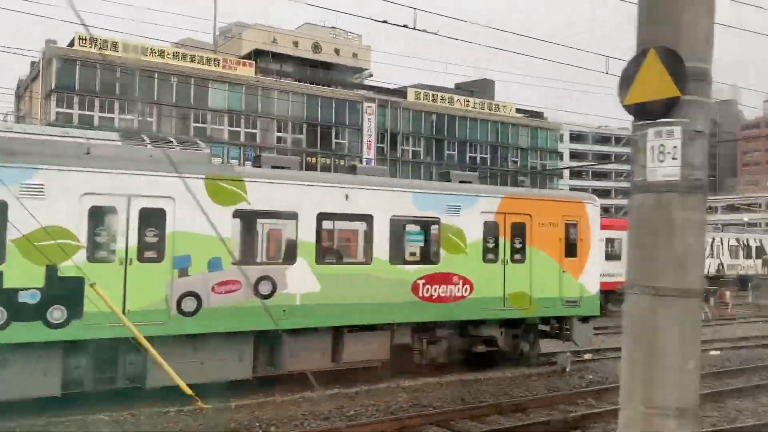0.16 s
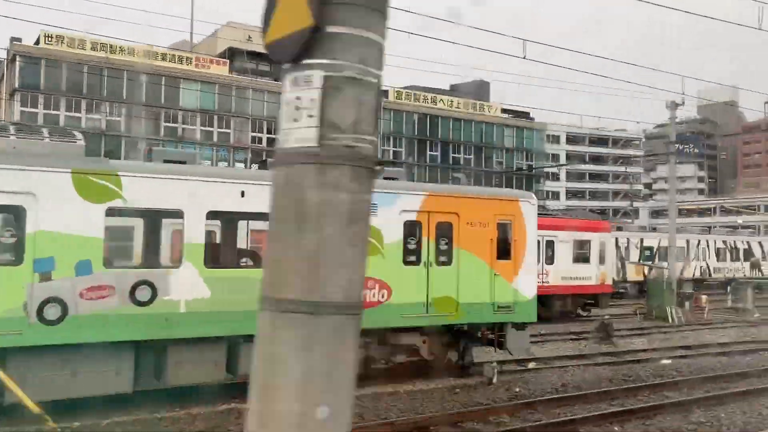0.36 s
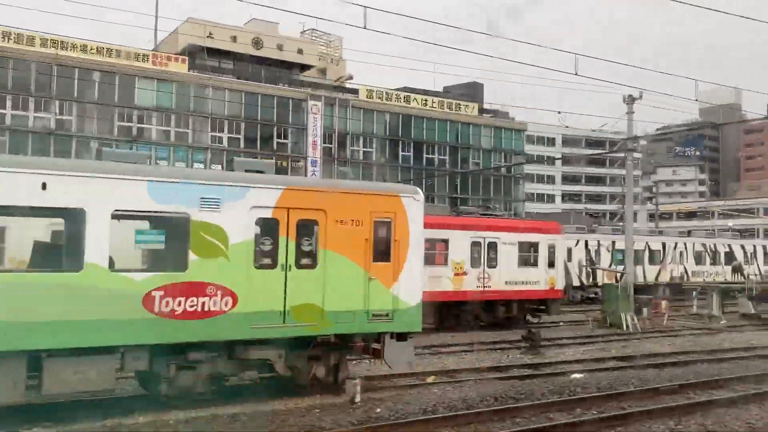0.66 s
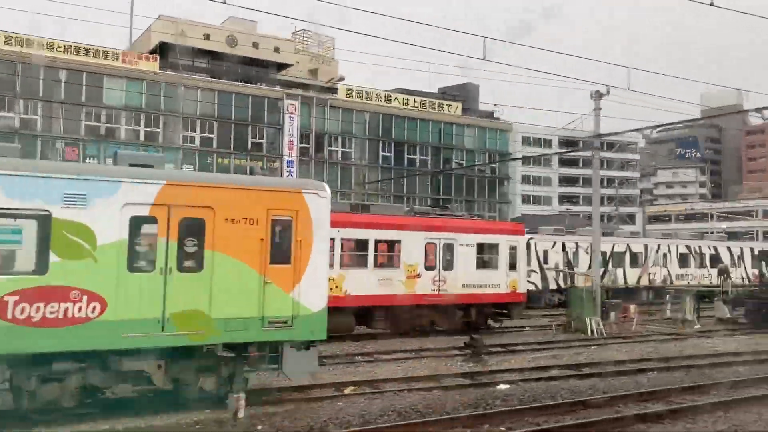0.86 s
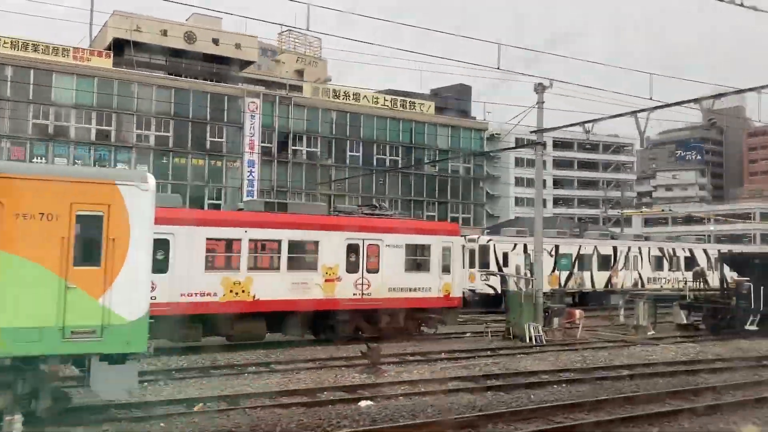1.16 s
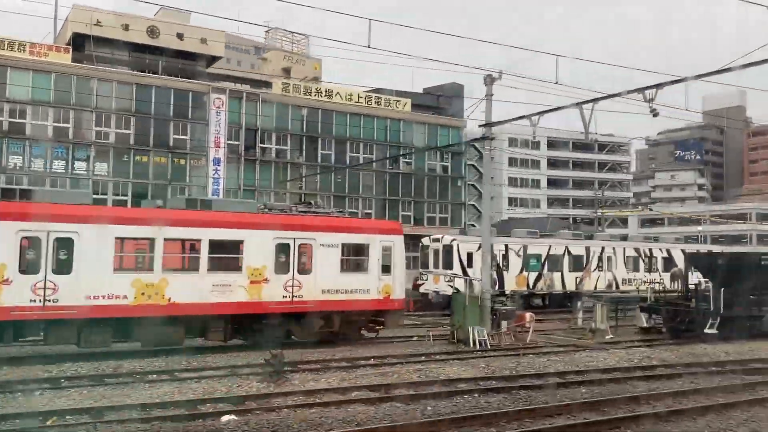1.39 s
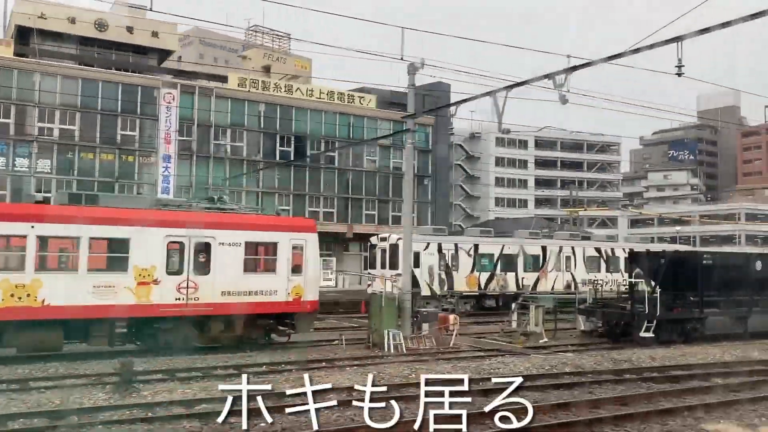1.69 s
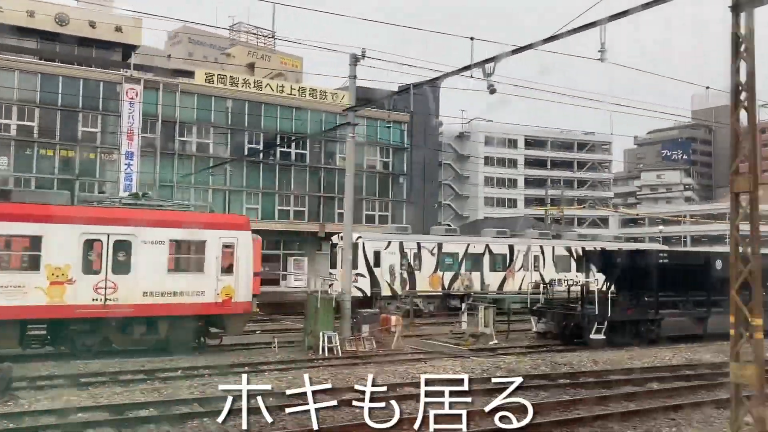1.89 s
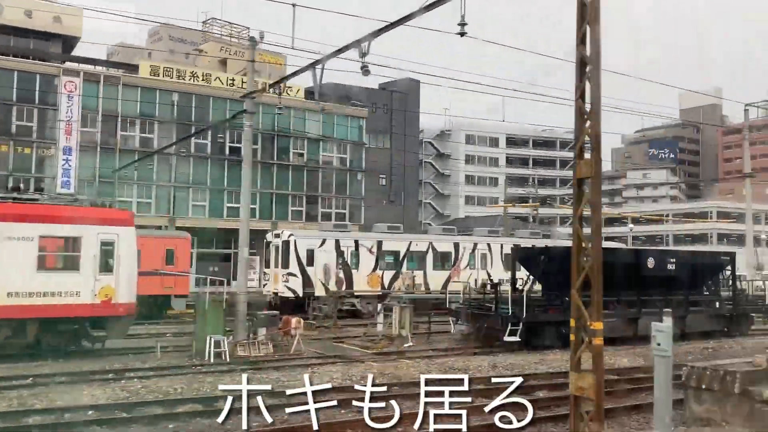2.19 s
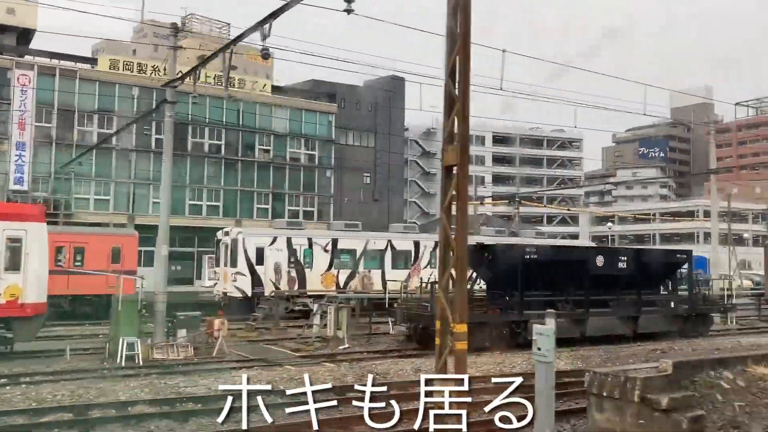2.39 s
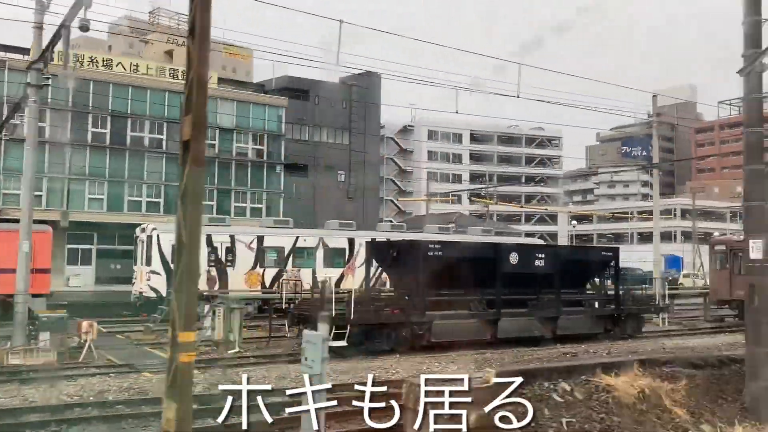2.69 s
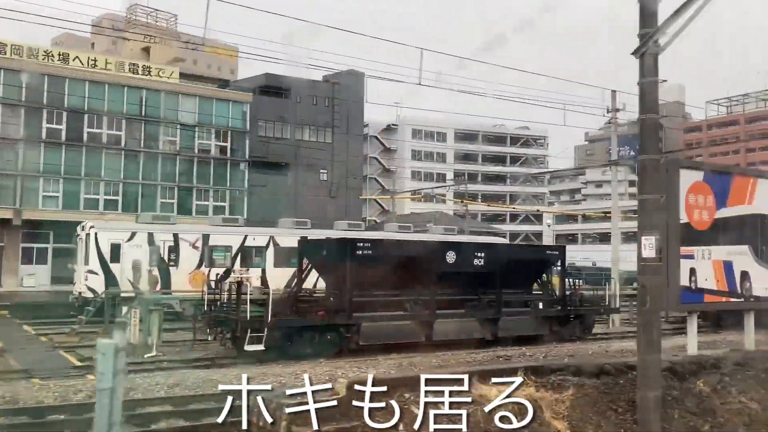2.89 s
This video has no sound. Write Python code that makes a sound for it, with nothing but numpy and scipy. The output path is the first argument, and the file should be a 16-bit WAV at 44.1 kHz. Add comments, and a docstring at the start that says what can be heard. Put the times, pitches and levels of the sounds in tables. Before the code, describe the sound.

Train wheels thud and clack irregularly over joints and points, heard inside the cabin in stereo; low rumble and electric hum continue beneath, with small rattles, air spits and a metallic clink late on.

```python
"""Electric train in a yard

The car rumbles and hums: filtered noise and wavering sines. Wheels thud over rail joints and points:
falling sines, panel modes, steel noise and a long modal ring. Fittings tick, rattle and jingle as
short resonant noise; what is probably compressed air spits, puffs and hisses as coloured noise.
Stereo sound in the small cabin: the likeness of the two sides depends on frequency."""
import sys
import numpy as np
from scipy import signal
from scipy.fft import rfft, irfft, next_fast_len
from scipy.io import wavfile
from scipy.ndimage import map_coordinates

SR = 44100
rng = np.random.default_rng(int(sys.argv[2]) if len(sys.argv) > 2 else 0)


def digitize_waveform(pressure):
    """Quantize a signal to 16-bit integers and store it at the path in sys.argv[1].

    Rows of a 2-D input are taken as channels; values are limited to [-1, 1].
    """
    field = np.atleast_2d(pressure).T
    bounded = np.clip(field, -1, 1)
    quanta = np.round(bounded * 32767).astype(np.int16)
    wavfile.write(sys.argv[1], SR, quanta)


N = 134505
T = np.arange(N) / SR  # time in seconds
M = next_fast_len(N + 8192)  # padded transform length
HZ = np.fft.rfftfreq(M, 1 / SR)

# Likeness of the two sides in the cabin. Each row: frequency in Hz, left-right correlation.
CABIN_ALIKE = [(60, 0.98), (150, 0.93), (260, 0.85), (500, 0.57), (1000, 0), (2000, 0), (5000, 0.056)]
# Singing of wheels on rails, which the jingle follows. Each row: time in seconds, relative level in dB.
SINGING_LEVEL = [(0, -58), (.45, -53), (.7, -51), (.88, -54), (1.4, -59), (2.0, -57), (2.5, -55),
                 (2.8, -50.5), (3.05, -52.5)]

METAL_ATTACK_S = 0.0019  # rise of a knock or clink
CHATTER_DB, CHATTER_RATE = 2.2, 140  # roughness of metal contact: depth in dB, knots per second


def amp(db):
    """Level law: decibels to amplitude ratio."""
    return 10 ** (np.asarray(db) / 20)


def unit(x):
    """Normalisation to unit mean power (rms 1)."""
    return x / np.sqrt(np.mean(x ** 2) + 1e-20)


def along(points):
    """Interpolation of (Hz, value) points on a logarithmic frequency axis."""
    hz, value = np.transpose(points)
    return np.interp(np.log(HZ + 1), np.log(hz + 1), value)


def curve(rows):
    """Linear interpolation of (seconds, value) points in time."""
    return np.interp(T, *np.transpose(rows))


def wobble(rate):
    """Slow random modulation: a smooth curve through normal random knots, rate per second."""
    knots = rng.standard_normal(int(N * rate / SR) + 4)
    return map_coordinates(knots, [T * rate])


def noise(spectrum_db, alike, phase=0):
    """Partially coherent coloured stereo noise of rms 1; phase is the lead of the left side in radians."""
    a, b = rfft(rng.standard_normal((2, M))) * amp(spectrum_db)
    # The cosine of twice this mixing angle is the correlation of the sides.
    angle = np.arccos(np.clip(along(alike), -1, 1)) / 2
    mid = a * np.cos(angle)
    side = b * np.sin(angle)
    left = (mid + side) * np.exp(1j * phase)
    right = mid - side
    return unit(irfft(np.array([left, right]), M)[:, :N])


def envelope(start, attack, hold, t60):
    """Transient law: linear rise, then exponential decay from hold seconds after the start."""
    t = T - start
    rise = np.clip(t / attack, 0, 1)
    return rise * amp(-60 * np.clip((t - hold) / t60, 0, 2))


def tone(hz):
    """Frequency and amplitude modulation of a sine of about rms 1."""
    drift_hz, swing_db = 2.033, 1
    level = np.sqrt(2) * amp(swing_db * wobble(6.73))
    cycles = np.cumsum(hz + drift_hz * wobble(14)) / SR
    return level * np.sin(2 * np.pi * cycles)


def ringing(modes, drift_hz, spread):
    """Modal sum of (Hz, dB) sines wavering in pitch; spread scatters the sides' phase, in radians."""
    out = np.zeros((2, N))
    for hz, db in modes:
        cycles = np.cumsum(hz + drift_hz * wobble(40)) / SR + rng.random()
        side_phase = np.outer([.5, -.5], spread * wobble(12))
        out += np.sqrt(2) * amp(db) * np.sin(2 * np.pi * cycles + side_phase)
    return out


def chatter():
    """Random amplitude modulation of rms 1, the roughness of metal contact."""
    return unit(amp(CHATTER_DB * wobble(CHATTER_RATE)))


def rolling():
    """Broadband rolling excitation: wheels roar and sing on the rails and the car body booms."""
    # Spectra of roar, singing and boom. Each row: frequency in Hz, relative density in dB per Hz.
    roar_spectrum = [(50, -32.5), (85, -14.5), (125, -5), (175, -1.5), (230, -9.5), (330, -10), (410, -11),
                     (490, -14), (590, -17.5), (680, -28.5), (800, -31.5), (1070, -31.5), (1300, -40),
                     (1950, -40.5), (2300, -41.5), (2900, -43), (3800, -49.5), (5500, -55), (9000, -77),
                     (15000, -100)]
    singing_spectrum = [(450, -23), (650, 9), (760, 6), (900, -1.5), (1080, 4.5), (1300, -7.5),
                        (1900, -12.5), (3000, -49.5)]
    boom_spectrum = [(15, -19), (30, -3), (42, 12), (60, 15.5), (78, 9), (105, 10), (150, -9), (300, -70)]
    # Courses of roar and boom. Each row: time in seconds, relative level in dB.
    roar_level = [(0.0, -33), (0.36, -37), (0.64, -32.5), (0.8, -35), (1.0, -31), (1.1, -33), (1.78, -34),
                  (1.84, -32), (2.21, -35.5), (2.54, -37), (2.7, -34.5), (3.05, -35)]
    boom_level = [(0, -47), (.13, -32), (.42, -38), (.53, -28), (.59, -28), (.65, -32.5), (.8, -30),
                  (.9, -29), (.98, -33), (1.45, -28.5), (1.55, -31), (1.68, -25.5), (1.76, -37),
                  (1.85, -23), (1.95, -32.5), (2.53, -37), (2.63, -27), (2.78, -36.5), (2.88, -29.5),
                  (3.05, -37.5)]
    gain_db, swing_db = 1.5, 1.2  # gain of roar and boom, random swing of roar and singing

    roar_gain = amp(curve(roar_level) + gain_db + swing_db * wobble(20))
    roar = noise(along(roar_spectrum), CABIN_ALIKE) * roar_gain
    singing_gain = amp(curve(SINGING_LEVEL) + swing_db * wobble(25.14))
    singing = noise(along(singing_spectrum), CABIN_ALIKE) * singing_gain
    boom = noise(along(boom_spectrum), CABIN_ALIKE) * amp(curve(boom_level) + gain_db)
    return roar + singing + boom


def hum():
    """Narrowband sources: steady tones of the electric gear and brief thin whines of the wheels."""
    # Electric gear. Each row: frequency in Hz, level in dB.
    gear_tones = [(60.5, -45), (145.2, -37), (289.5, -45.5), (435, -47), (555, -54.5), (2013, -79.5)]
    # Wheel whines. Each row: start in seconds, time to release in seconds, frequency in Hz, level in dB.
    whines = [(2.29, .33, 1067, -56.5), (2.29, .36, 1421, -67.5), (1.445, .04, 10300, -68)]
    whine_attack_s, whine_t60_s = 0.014, .3

    out = np.zeros(N)
    for hz, db in gear_tones:
        out += amp(db) * tone(hz)
    for start, hold, hz, db in whines:
        out += amp(db) * tone(hz) * envelope(start, whine_attack_s, hold, whine_t60_s)
    return out


def jingle():
    """Shot noise of small random steel contacts in the running gear, stronger when the rails sing."""
    # Spectrum of the contacts. Each row: frequency in Hz, relative density in dB per Hz.
    jingle_spectrum = [(500, -9), (850, 11), (1300, 3), (1600, -7), (1920, 3), (2250, -11.5), (2800, -0.5),
                       (3300, -4), (4000, -18.5), (8000, -40)]
    contacts_per_s, scatter_db, t60_s = 55, 7, .05
    level_db = -3.5  # relative to the singing

    hits = (rng.random(N) < contacts_per_s / SR) * amp(scatter_db * rng.uniform(-1.5, 1, N))
    power_decay = amp(-60 * T / t60_s) ** 2
    power = np.abs(signal.fftconvolve(hits ** 2, power_decay)[:N])
    strength = unit(np.sqrt(power)) * amp(curve(SINGING_LEVEL) + level_db)
    return strength * noise(along(jingle_spectrum), CABIN_ALIKE)


def air():
    """Turbulent jet noise: leak, puffs and spits add in power, and more flow is brighter."""
    # Steady leak. Each row: time in seconds, relative level in dB.
    leak = [(0, -66.5), (.2, -65), (.27, -56), (.48, -63.5), (1.02, -65.5), (1.43, -64), (1.6, -64),
            (1.9, -62.5), (2.0, -66), (2.35, -58.5), (2.55, -59.5), (2.575, -54), (2.78, -52.5),
            (3.05, -51.5)]
    # Puffs. Each row: start in seconds, relative level in dB, time to release and t60 in seconds.
    puffs = [(0.05, -58, 0.017, 0.17), (0.163, -56, 0.011, 0.21), (0.274, -48.5, 0.019, 0.26),
             (.325, -52.5, 0.025, 0.41), (0.52, -57.5, 0.028, 0.11), (0.779, -48, 0.014, 0.4),
             (0.845, -45.5, 0.016, 0.19), (1.069, -51.5, 0.023, 0.14), (1.14, -52.5, 0.018, 0.21),
             (1.243, -55, 0.0077, .17), (1.454, -61.5, 0.064, 0.23), (1.54, -59.5, 0.057, .2),
             (1.626, -57, .05, .2), (2.101, -53.5, 0.043, 0.15), (2.253, -58.5, 0.029, .15),
             (2.415, -64, .01, 0.13), (2.553, -46, 0.027, 0.42)]
    # Sharp spits. Each row: start in seconds, relative level in dB.
    spits = [(0.28, -55.5), (.407, -58), (0.622, -50.5), (0.691, -57.5), (1.241, -56), (1.535, -71),
             (1.58, -58), (1.719, -47.5), (2.069, -54), (2.099, -41), (2.291, -49), (2.84, -58)]
    # Hiss spectrum. Each row: frequency in Hz, relative density in dB per Hz.
    air_spectrum = [(600, -14), (1500, 1), (3000, 2), (4500, 1), (5800, -2.5), (7000, -2), (8100, 0),
                    (9500, -1.5), (10800, 1.5), (12000, -1.5), (13300, -3), (14500, -6), (15700, -5.5)]
    # Likeness of the sides in the hiss. Each row: frequency in Hz, left-right correlation.
    air_alike = [(1500, .1), (5000, 0.18), (6500, 0.44), (8000, 1), (9200, 1), (11500, 0.74), (13500, 1),
                 (15000, 0.94)]
    puff_attack_s, spit_attack_s, spit_t60_s = 0.0042, 0.00028, 0.03
    ripple_db, ripple_knot_hz = 2.3, 100  # nearby surfaces colour the hiss
    left_lag_s, inphase_hz = .00022, 6850  # the left side lags a little, in phase near 6850 Hz
    bright_hz, full_db = 12000, -42  # start of the top end, flow level that leaves it unaltered
    brightens = 0.43  # extra dB of top end for each dB of flow

    power = amp(curve(leak)) ** 2
    for start, db, hold, t60 in puffs:
        power += (amp(db) * envelope(start, puff_attack_s, hold, t60)) ** 2
    for start, db in spits:
        power += (amp(db) * envelope(start, spit_attack_s, spit_attack_s, spit_t60_s)) ** 2
    flow = np.sqrt(power) * amp(1.5 + 0.89 * wobble(220))  # overall gain and fast flutter in dB

    ripple = ripple_db * map_coordinates(rng.standard_normal(size=2048), [HZ / ripple_knot_hz])
    left_phase = -2 * np.pi * left_lag_s * (HZ - inphase_hz)
    hiss = noise(along(air_spectrum) + ripple, air_alike, left_phase)
    body = irfft(rfft(hiss, M) / (1 + (HZ / bright_hz) ** 8), M)[:, :N]
    top = hiss - body
    return flow * (body + top * (flow / amp(full_db)) ** brightens)


def rattles():
    """Damped resonance: brief knocks of loose fittings, each noise around its own pitch."""
    # Each row: start in seconds, level in dB, pitch in Hz, width in octaves, t60 in seconds.
    knocks = [(0.096, -48.5, 2370, 0.62, 0.063), (.3, -46.5, 1430, .7, 0.29), (.783, -46, 2700, 0.71, 0.16),
              (1.535, -41.5, 3800, .12, .035), (1.535, -51, 5300, .08, .032), (1.574, -42, 3680, .09, .045),
              (1.574, -54, 5500, .07, .036), (1.72, -48.5, 3650, .12, .07), (1.91, -39, 1140, .09, .11),
              (1.908, -38.5, 1450, .15, .11), (2.103, -41, 650, .12, .2), (2.103, -40.5, 1000, .25, .17),
              (2.422, -48, 4700, 0.31, 0.12), (2.808, -45.5, 1420, 0.34, 0.15),
              (2.9, -48.5, 1730, .2, 0.34)]
    out = np.zeros((2, N))
    for start, db, hz, width, t60 in knocks:
        octaves = np.log2((HZ + 1) / hz)
        resonance_db = -20 * np.log10(1 + (octaves / width) ** 2)
        knock = envelope(start, METAL_ATTACK_S, METAL_ATTACK_S, t60)
        out += amp(db) * noise(resonance_db, CABIN_ALIKE) * knock
    return out


def clacks():
    """Impact excitation: a wheel blow thuds in the floor, rings panels, clashes and leaves the wheel singing."""
    # Wheel blows. Each row: start in seconds, time to release in seconds, thud pitch in Hz,
    # then thud, panel and steel levels in dB, the last two relative.
    blows = [(.425, .02, 148, -24, -38, -52), (.52, .05, 150, -28, -32.5, -52),
             (.625, .017, 207, -25, -34, -52), (.477, .016, 160, -14.5, -39, -51),
             (.58, .025, 58, -23, -42, -62), (.715, .02, 150, -30, -34, -50),
             (.742, .026, 135, -17, -32, -54), (.856, .02, 72, -18.5, -48, -68),
             (.892, .012, 95, -15, -42, -62), (1.048, .035, 300, -25.5, -31.5, -53),
             (1.068, .008, 160, -27, -35, -48), (1.104, .016, 154, -18, -31, -53),
             (1.264, .016, 195, -12, -23, -35.5), (1.288, .022, 140, -16, -25, -40),
             (1.596, .012, 160, -11, -34, -54), (1.617, .014, 175, -17, -29, -53),
             (1.646, .012, 90, -21, -38, -64), (1.695, .007, 110, -15.5, -42, -64),
             (1.812, .034, 172, -10.5, -29.5, -45.5), (1.835, .014, 240, -24, -29, -48),
             (2.555, .035, 118, -23, -35, -61), (2.754, .06, 134, -25, -33.5, -53)]
    # Noise of panels and steel. Each row: frequency in Hz, relative density in dB per Hz.
    panel_spectrum = [(60, -21), (120, -17), (200, 1), (300, 0), (400, -3), (480, -5), (600, -6),
                      (680, -14.5), (900, -16), (1300, -35), (3000, -83)]
    steel_spectrum = [(500, -7), (700, 12.5), (900, 6.5), (1120, 3), (1350, -0.5), (1540, 2), (1700, -1),
                      (1900, 0), (2060, 4), (2300, -9.5), (2520, -4), (2680, -1.5), (2900, -3.5),
                      (3100, -2.5), (3300, -3), (3600, -14.5), (4000, -19.5), (8000, -38), (15000, -67)]
    # Floor and wall panel resonances. Each row: frequency in Hz, relative level in dB.
    panel_modes = [(258, -10.5), (305, -6.5), (393, -7), (452, -15), (565, -11.5), (622, -18)]
    # Long ring of wheel and rail. Each row: frequency in Hz, level in dB over the steel clash.
    wheel_modes = [(872, -15), (915, -17), (1050, -20), (2050, -29), (2680, -25.5), (2794, -21.5),
                   (2900, -26), (3285, -28)]
    attack_s, thud_t60_s, panel_t60_s, steel_t60_s, wheel_t60_s = .003, .08, .2, .15, .85
    thud_sag = .8  # fall in pitch, share per second
    thud_lead, panel_spread, metal_spread = 0.35, 1, 1.2  # phase between the sides in radians
    panel_noise_db, panel_drift_hz = -2, 12
    wheel_drift_hz, wheel_flutter_db = 20, 4.5

    thud = np.zeros((2, N))
    panel_power, steel_power, wheel_power = np.zeros((3, N))
    side_phase = np.array([[.5], [-.5]]) * thud_lead
    for start, hold, hz, thud_db, panel_db, steel_db in blows:
        t = np.clip(T - start, 0, .3)
        cycles = hz * (t - thud_sag * t * t / 2)
        swing = -np.sin(2 * np.pi * cycles + side_phase)
        thud += amp(thud_db) * swing * envelope(start, attack_s, hold, thud_t60_s)
        panel_power += (amp(panel_db) * envelope(start, attack_s, hold, panel_t60_s)) ** 2
        steel_power += (amp(steel_db) * envelope(start, attack_s, hold, steel_t60_s)) ** 2
        wheel_power += (amp(steel_db) * envelope(start, attack_s, hold, wheel_t60_s)) ** 2

    panel_sound = amp(panel_noise_db) * noise(along(panel_spectrum), CABIN_ALIKE)
    panel_sound += ringing(panel_modes, panel_drift_hz, panel_spread)
    panels = np.sqrt(panel_power) * panel_sound
    clash = np.sqrt(steel_power) * chatter() * noise(along(steel_spectrum), CABIN_ALIKE)
    flutter = unit(amp(wheel_flutter_db * wobble(70)))
    wheel = np.sqrt(wheel_power) * flutter * ringing(wheel_modes, wheel_drift_hz, metal_spread)
    return thud + panels + clash + wheel


def fitting():
    """Modal filtering: a loose metal fitting clinks and scrapes through the same damped resonances."""
    # Clinks. Each row: start in seconds, level in dB, t60 in seconds.
    clinks = [(2.422, -41, .1), (2.57, -41.5, .15), (2.588, -45, .17)]
    # Resonances of the fitting. Each row: frequency in Hz, relative level in dB.
    clink_modes = [(1060, 2), (1700, 2), (2015, 2), (2350, -4), (2890, -7), (3870, -9), (4640, -7),
                   (4980, -7), (5700, -7), (6910, -10)]
    width_hz = 150  # half-power bandwidth of each resonance

    strength = np.zeros(N)
    for start, db, t60 in clinks:
        strength += amp(db) * envelope(start, METAL_ATTACK_S, METAL_ATTACK_S, t60)
    mode_power = np.zeros(len(HZ))
    for hz, db in clink_modes:
        mode_power += amp(db) ** 2 / (1 + (2 * (HZ - hz) / width_hz) ** 2)
    return strength * chatter() * noise(10 * np.log10(mode_power), CABIN_ALIKE)


def scene():
    """Superposition of all sources, with the cabin's uneven left-right balance."""
    # Balance of the cabin. Each row: frequency in Hz, left over right in dB.
    cabin_tilt = [(60, -3), (140, -1.5), (260, 1.5), (500, 1.5), (1000, 3), (2000, -0.7), (6000, -0.1)]
    sound = rolling() + hum() + jingle() + air() + rattles() + clacks() + fitting()
    balance = amp(np.outer([.5, -.5], along(cabin_tilt)))
    return irfft(rfft(sound, M) * balance, M)[:, :N]


def record(dry):
    """Band limitation: nothing is kept from 15800 Hz up."""
    return irfft(rfft(dry, M) * (HZ < 15800), M)[:, :N]


dry = scene()
out = record(dry)
digitize_waveform(out)
```